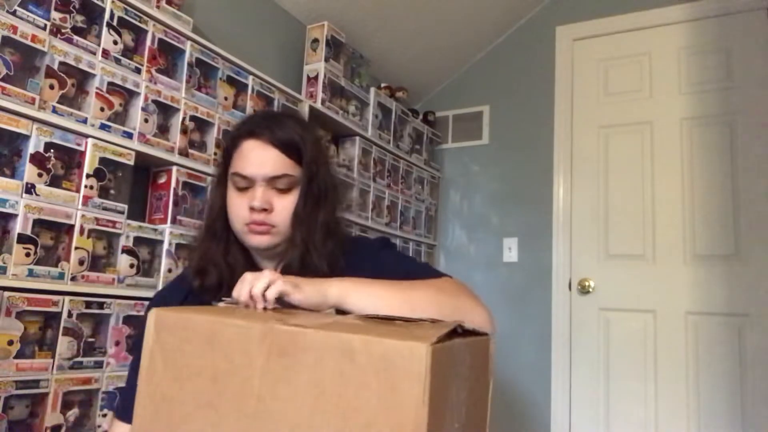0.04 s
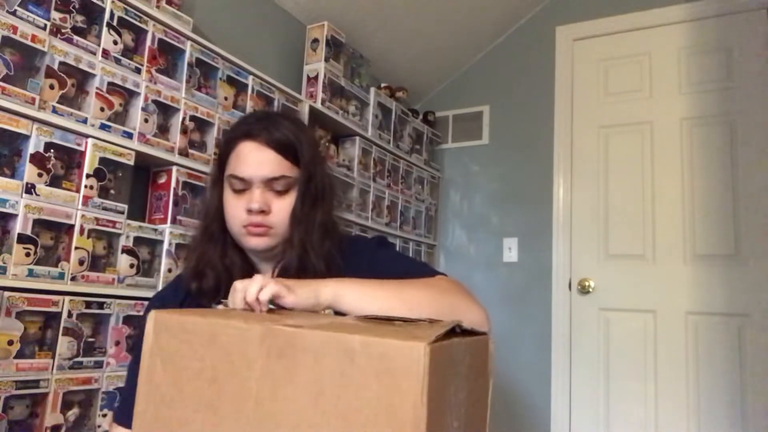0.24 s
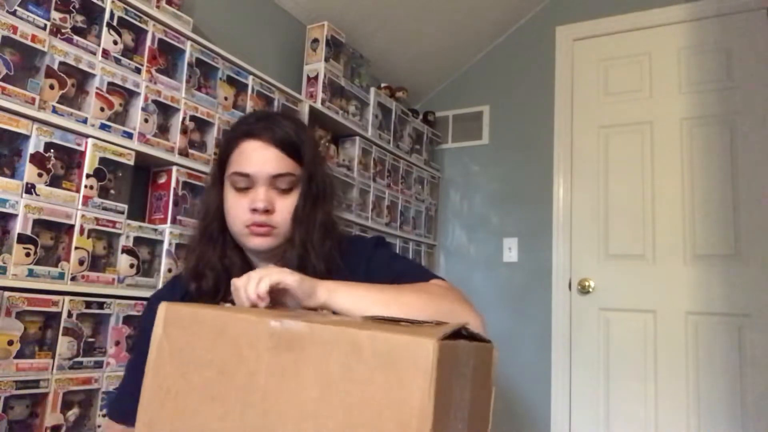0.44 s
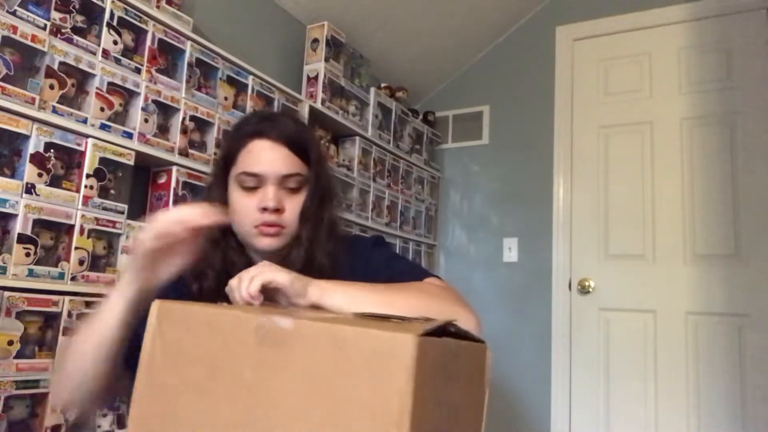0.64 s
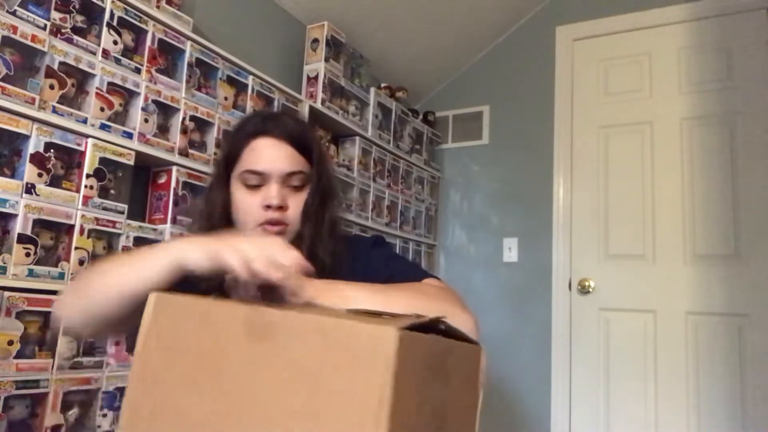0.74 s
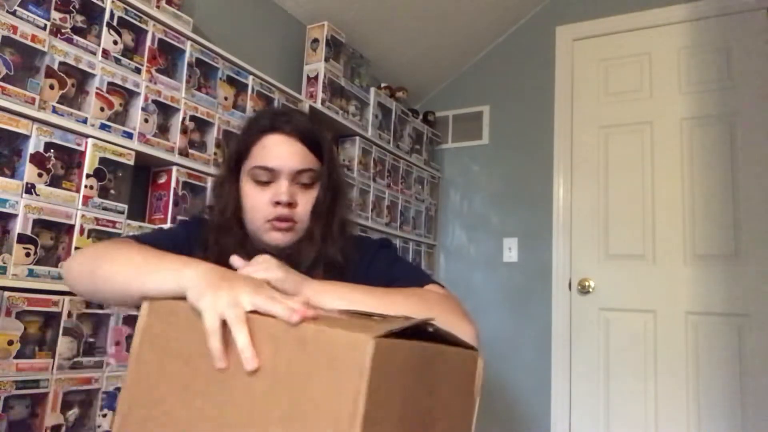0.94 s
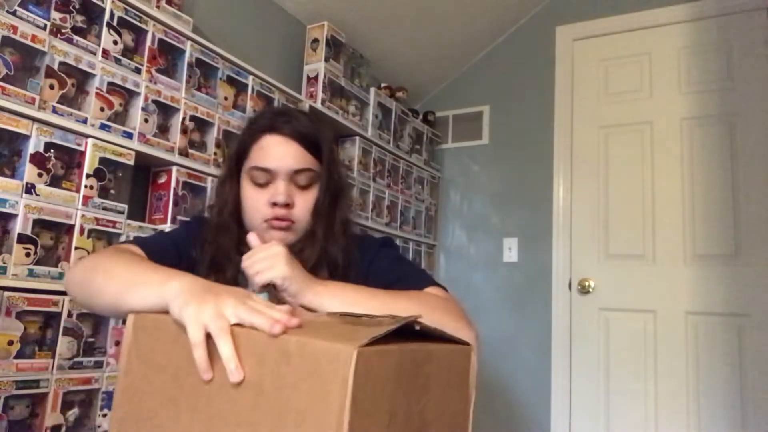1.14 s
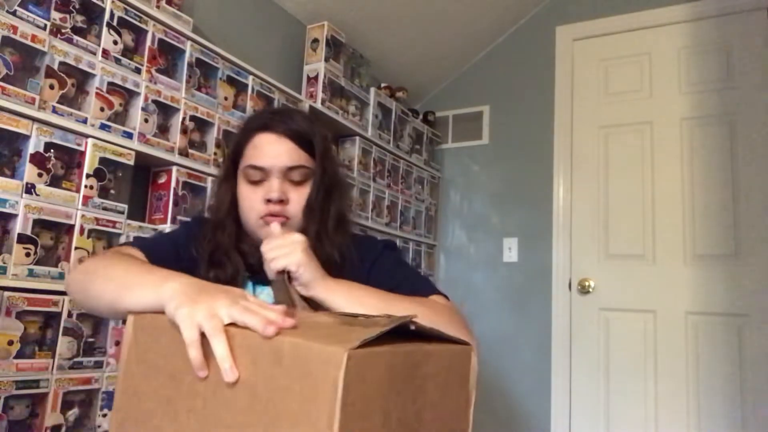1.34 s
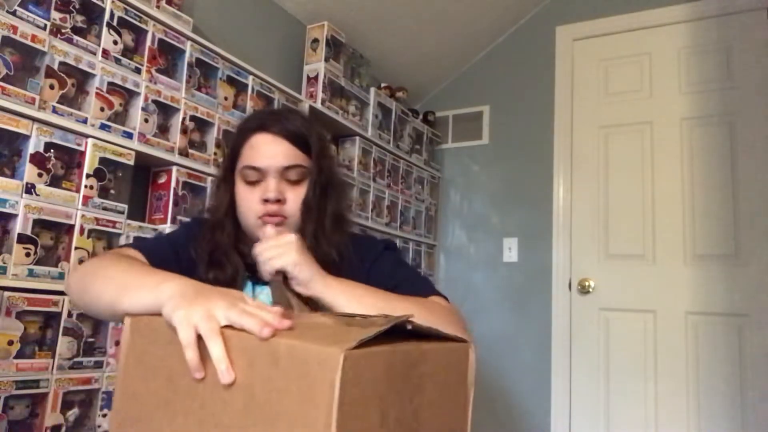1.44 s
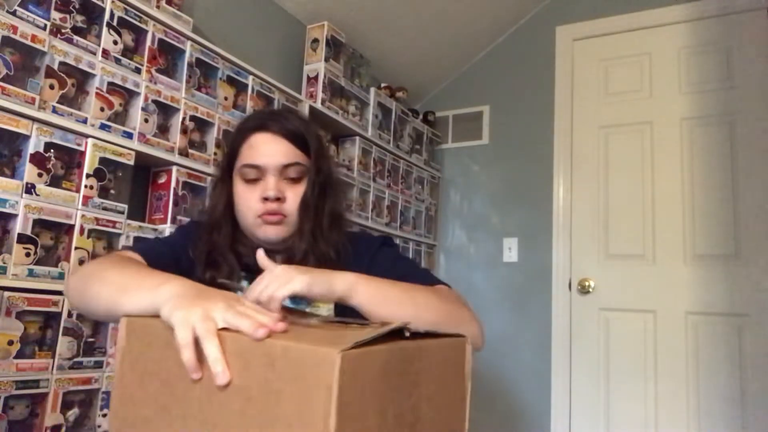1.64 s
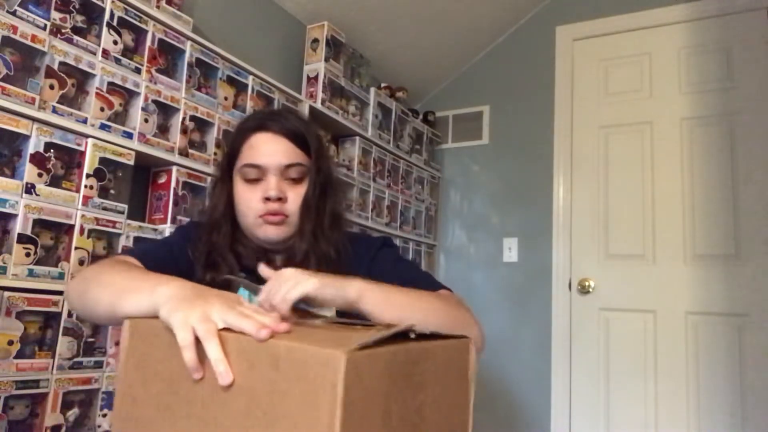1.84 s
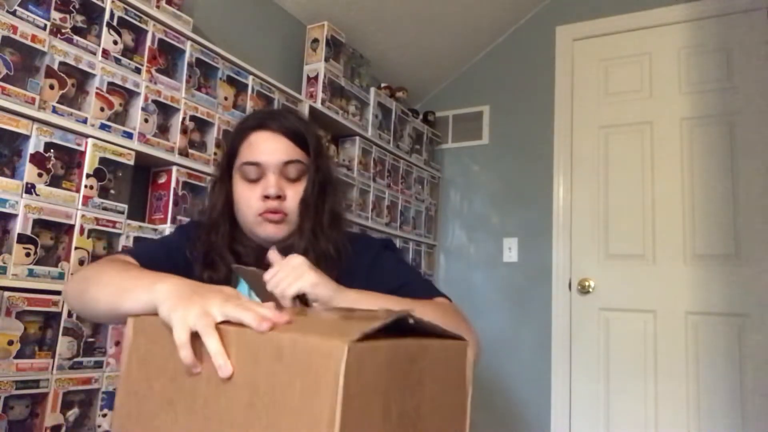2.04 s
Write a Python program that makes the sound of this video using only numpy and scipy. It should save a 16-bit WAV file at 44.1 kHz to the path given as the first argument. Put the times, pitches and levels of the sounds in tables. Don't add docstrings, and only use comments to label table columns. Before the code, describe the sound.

Tape on a cardboard box being scratched and ripped loose, with loud snaps and dull hollow bumps

```python
import sys
import numpy as np
from scipy import signal
from scipy.fft import rfft, irfft
from scipy.io import wavfile
from scipy.ndimage import uniform_filter1d

SR = 44100
rng = np.random.default_rng(int(sys.argv[2]) if len(sys.argv) > 2 else 0)


def invert_db(level):
    return 10 ** (np.asarray(level, dtype=float) / 20)


def digitize_waveform(pressure):
    field = np.atleast_2d(pressure).T
    bounded = np.clip(field, -1, 1)
    quanta = np.round(bounded * 32767).astype(np.int16)
    wavfile.write(sys.argv[1], SR, quanta)


N = 91375


def evened(x):
    return x / np.sqrt(np.mean(x ** 2) + 1e-20)


def peaked(x, db):
    return invert_db(db) * x / abs(x).max()


def read(points, hz):
    f, value = np.transpose(points)
    return np.interp(np.log(hz + 1), np.log(f + 1), value)


def add(mix, s, sound):
    part = mix[round(s * SR):][:len(sound)]
    part += sound[:len(part)]


def ring(x, hz, width):
    b, a = signal.iirpeak(min(hz, 0.45 * SR), max(hz / width, 0.2), SR)
    return signal.lfilter(b, a, x)


def click(points, size=8000):
    log_gain = read(points, abs(np.fft.fftfreq(4096, 1 / SR))) * np.log(10) / 20
    phase = -signal.hilbert(log_gain).imag
    impulse = np.fft.ifft(np.exp(log_gain + 1j * phase)).real[:2048]
    return np.pad(impulse, (0, size))[:size]


def bell(hz, octaves, skirt_db):
    f = np.geomspace(100, 20000, num=40)
    u = np.log2(f / hz)
    hump = skirt_db * (1 - np.exp(-0.5 * (u / octaves) ** 2))
    bass_fall = 9 * np.minimum(np.log2(f / 1300), 0)
    treble_fall = -1.14 * np.maximum(u, 0)
    return np.transpose([f, hump + bass_fall + treble_fall])


def stroke(length, rise):
    u = np.linspace(0, 1, round(length * SR))
    return np.sin(np.pi * u ** (np.log(0.5) / np.log(np.clip(rise, 0.1, 0.9))))[:8000]


def grit(size, per_s, spread_db):
    chance, sign, extra = rng.random(size), rng.choice([-1., 1.], size), rng.exponential(1, size)
    return evened((chance < per_s / SR) * sign * invert_db(spread_db * np.minimum(extra, 4)))


def card(x):
    # f/Hz, level/dB, t60/s
    panel_modes = [(285, -11, 0.24), (642.5, 13, 0.074), (1090, 1, 0.15), (1243, -5, 0.19),
                   (1376, -6, 0.25), (1696, 1, 0.032), (1890, -27, 0.041), (2180, -28, 0.033),
                   (2400, -3, 0.14), (2970, -9, 0.042)]
    t = np.arange(len(x)) / SR
    modes = sum(invert_db(db - 60 * t / min(t60, 0.12)) * np.sin(2 * np.pi * hz * t) for hz, db, t60 in panel_modes)
    return signal.fftconvolve(x, modes)[:len(x)]


def hollow(x):
    # f/Hz, width/Hz, level/dB
    cavity_modes = [(111, 105, -10.5), (201.6, 34.4, -8.5), (240.8, 19.3, -6), (295.8, 20, -6.5)]
    boom = np.zeros(len(x))
    for k, (hz, width, db) in enumerate(cavity_modes):
        boom += (-1) ** k * invert_db(db) * ring(ring(x, hz, width), hz, 2.3 * width)
    return boom


def snaps():
    # t/s, peak level/dB, box level/dB, film f/Hz, room level/dB
    tears = [
        (1.0921, -4, -23.5, 1890, -1),
        (1.2854, -18, -13.5, 1510, -2),
        (1.7148, -20, -25, 5260, -6.5),
    ]
    # f/Hz, level/dB
    colours = [
        [(88, -22.5), (150, -12.5), (514, -1), (637, -5.5), (821, -0.5), (1830, -9), (2220, -10), (3920, 0.5),
         (16000, -6.5)],
        [(88, -21), (150, 2), (514, 10), (637, 4), (821, 3.5), (1500, -3), (2550, 8), (4160, 2.5), (16000, -9)],
        [(530, -35), (900, 9), (1150, -11), (1660, 6.5), (1970, -8.5), (4920, -9.5), (5680, -17), (6330, -6.5),
         (16000, -10)],
    ]
    # t from the snap/s, level/dB
    further_slips = [
        (-.0009, -17),
        (-.0005, -38),
        (.0006, 2.5),
    ]
    near, far = np.zeros(N), np.zeros(N)
    for (s, db, box_db, hz, room_db), colour in zip(tears, colours):
        slip = click(colour)
        film = ring(slip, hz, hz / 3)
        thin = peaked(slip, 0) + peaked(film, 6)
        for late, slip_db in further_slips:
            shape = thin if late > 0 else np.diff(thin, prepend=0)
            add(near, s + late, -peaked(shape, db + slip_db))
        box = peaked(card(slip), db + box_db) + peaked(hollow(slip), db + box_db - 4.5)
        add(near, s, peaked(thin, db) + box)
        far_film = peaked(peaked(slip, 0) + peaked(film, 5), db)
        add(far, s, invert_db(room_db) * (far_film + box))
    return signal.lfilter(*signal.butter(1, 6000, fs=SR), near), far


def rattle():
    # t/s, peak level/dB, f/Hz, t60/s
    rings = [(1.0922, -6, 1880, .012), (1.095, -14, 2330, 0.0064), (1.094, -17, 285, 0.043),
             (1.0985, -8.5, 2120, 0.0053), (1.099, -16.5, 3320, 0.0078), (1.0995, -13, 1213, 0.022),
             (1.106, -20, 1760, 0.038), (1.1095, -30, 3920, 0.0066), (1.115, -18, 1224, 0.012),
             (1.117, -16, 1980, 0.0063), (1.126, -27, 285, 0.041), (1.13, -27, 1210, 0.1),
             (1.2855, -25, 1620, 0.014), (1.2862, -19.5, 538, 0.019), (1.288, -25, 2090, 0.018),
             (1.295, -27.5, 652, 0.16), (1.296, -27.5, 2640, 0.0096), (1.3, -33, 1190, 0.052),
             (1.313, -35, 2660, .015), (1.323, -34.5, 1100, 0.015), (1.323, -31, 298, 0.02),
             (1.336, -33.5, 653, 0.021), (1.0935, -23, 710, .04), (1.104, -23.5, 715, 0.024),
             (1.2859, -31, 3610, 0.011), (1.297, -31, 3050, .015), (1.307, -36, 2220, 0.021),
             (.067, -48.5, 2870, 0.074), (.068, -47.5, 740, 0.11), (.097, -41.5, 620, 0.15)]
    out, t = np.zeros(N), np.arange(8000) / SR
    onset = 1 - np.exp(-t / 0.00022)
    for s, db, hz, t60 in rings:
        add(out, s, peaked(onset * invert_db(-60 * t / t60) * np.sin(2 * np.pi * hz * t), db))
    return out


def ticks():
    # t/s, peak level/dB, f/Hz
    bonds = [(.504, -46.5, 9300), (0.5686, -57, 9350), (0.5796, -39, 12100), (.5872, -44, 8100),
             (0.5933, -34.5, 7140), (0.5948, -42, 2060), (0.603, -52, 5960), (.604, -55, 2230),
             (0.557, -52, 4300), (.631, -55, 1450), (0.648, -50, 11400), (0.6928, -42.5, 5940),
             (0.6924, -45.5, 1480), (0.7348, -47, 3860), (.752, -42.5, 8300), (0.7799, -38, 3820),
             (0.811, -46, 1940), (0.82, -39, 2600), (0.825, -36.5, 5760), (0.8413, -35.5, 3400),
             (0.8527, -44, 2200), (.857, -34.5, 5270), (0.857, -40, 3600), (.864, -40, 4100),
             (0.87, -36.5, 2770), (0.885, -54, 2480), (0.9015, -40, 4230), (.913, -43, 4160),
             (0.933, -43, 1520), (0.9534, -32, 1890), (0.955, -40.5, 3420), (0.9935, -43.5, 2520),
             (.993, -50, 4340), (1.0317, -37.5, 1890), (1.0495, -41.5, 6000), (1.055, -47, 4100),
             (1.264, -45.5, 3760), (1.2853, -31, 7500), (1.0985, -20.5, 12000), (1.113, -38, 13500),
             (1.386, -43.5, 7950), (1.4958, -44, 4960), (1.7972, -39, 4350), (1.9687, -33, 3340),
             (1.98, -32, 12000), (1.996, -56, 13200), (2.008, -54, 12600), (2.033, -41, 5500),
             (2.049, -41, 12000)]
    out = np.zeros(N)
    for (s, db, hz), (a, b) in zip(bonds, rng.random((len(bonds), 2))):
        slip = click(bell(hz, octaves=0.45, skirt_db=-11), size=600)
        slip = peaked(peaked(slip, 0) + peaked(ring(slip, hz, hz / 3), 0), db)
        add(out, s, slip)
        add(out, s + 0.0003 + 0.0007 * a, -invert_db(-3 - 6 * b) * slip)
    return out


def crackle():
    # t/s, length/s, rms level/dB, f/Hz
    patches = [
        (0.759, 0.17, -71.5, 3270),
        (0.85, 0.022, -60, 3730),
        (0.9, 0.14, -61.5, 2400),
        (1.027, 0.071, -58, 3060),
        (1.297, 0.12, -64.5, 7900),
        (1.87, 0.18, -58.5, 5140),
    ]
    out = np.zeros(N)
    for s, length, db, hz in patches:
        shower = 0
        for k in (0.5, 0.8, 1.2, 1.7):
            slips = grit(8000, per_s=200, spread_db=4)
            shower = shower + signal.fftconvolve(slips, click(bell(hz * k, 0.26, -8.5), size=600))
        env = stroke(length, 0.34)
        add(out, s, invert_db(db) * env * evened(shower)[:len(env)])
    return out


def bumps():
    # t/s, peak level/dB, push f/Hz
    pushes = [(0.47, -31, 113), (0.482, -21.5, 135), (0.493, -37.5, 230), (0.503, -32.5, 180),
              (0.529, -44, 245), (0.544, -51, 250), (0.615, -34.5, 110), (1.575, -34, 174),
              (1.65, -32.5, 164), (1.666, -33.5, 193), (1.676, -39.5, 270), (1.69, -42, 280),
              (1.97, -38, 227)]
    out = np.zeros(N)
    for s, db, hz in pushes:
        cycles = np.arange(12000) / SR * hz
        push = np.sin(2 * np.pi * cycles) * cycles * np.exp(-(cycles / 0.716) ** 2)
        add(out, s, peaked(push, db) + peaked(hollow(push), db - 29.5))
    return out


def taps():
    # t/s, peak level/dB, f/Hz
    nail_taps = [
        (0.022, -47, 1200),
        (.900, -34.5, 694),
        (.9535, -35.5, 583),
        (1.5671, -38.5, 990),
        (1.575, -33.5, 970),
    ]
    # t/s, peak level/dB
    flap_slips = [
        (1.4211, -40.5),
        (1.4329, -35),
        (1.44, -31.5),
        (1.4501, -31.5),
        (1.462, -37),
    ]
    # f/Hz, width/Hz, level/dB
    flap_modes = [(317, 220, -4), (1100, 260, 6), (3010, 1300, 8)]
    out, contact = np.zeros(N), click([(100, -5.5), (3000, 0.5), (16000, 3)])
    for s, db, hz in nail_taps:
        nail = ring(ring(contact, hz, 0.5 * hz), hz, hz)
        add(out, s, peaked(nail, db) + peaked(card(contact), db - 3))
    slip = np.zeros(len(contact))
    for k, (hz, width, db) in enumerate(flap_modes):
        slip += (-1) ** k * peaked(ring(ring(contact, hz, width), hz, 3 * width), db)
    for s, db in flap_slips:
        add(out, s, peaked(slip, db))
    return out


def wandering(x, hz, width):
    noise = rng.standard_normal(len(x))
    drift = evened(uniform_filter1d(uniform_filter1d(noise, size=600), size=600))
    turn = np.exp(2j * np.pi * np.cumsum(hz * (1 + 0.06 * drift)) / SR)
    r = np.exp(-np.pi * width / SR)
    smooth = signal.lfilter([1], [1, -r], signal.lfilter([1], [1, -r * r], x / turn))
    return (turn * smooth).real


def scrapes():
    # t/s, length/s, rms level/dB, span f/Hz, card level/dB
    strokes = [(.01, 0.025, -61, 1270, -4), (0.069, 0.039, -50, 1570, -9),
               (0.089, 0.077, -46.5, 1690, -4.5), (0.161, 0.11, -47.5, 1620, -12),
               (0.213, 0.057, -38, 1585, -43), (0.233, 0.047, -47, 1130, -40),
               (0.769, 0.042, -65.5, 2670, 13.5), (0.856, 0.15, -60, 1740, 6.5),
               (1.028, 0.031, -71, 1880, -21), (1.404, 0.083, -61.5, 1100, 5.5),
               (1.552, 0.41, -64, 1320, 2), (1.797, 0.036, -64, 1530, 12), (1.879, 0.22, -69.5, 1280, 12)]
    card_hz, sag = 550, 0.094
    out = np.zeros(N)
    for s, length, db, hz, low_db in strokes:
        g = grit(8000, per_s=2500, spread_db=3)
        env = stroke(length, 0.22)
        slide = np.minimum(np.arange(len(g)) / len(env), 1) * np.pi / 2
        f_high, f_low = card_hz * (1 + sag), card_hz * (1 - sag)
        high = evened(ring(ring(g, f_high, 108), f_high, 270))
        low = evened(ring(ring(g, f_low, 108), f_low, 270))
        tone = evened(wandering(g, hz, hz / 4.2))
        tone += invert_db(low_db) * (np.cos(slide) * high + np.sin(slide) * low)
        tone += invert_db(-6.5) * evened(ring(g, 1.9 * hz, 0.33 * hz))
        add(out, s, invert_db(db) * env * tone[:len(env)])
    return out


def rubs():
    # t/s, length/s, rms level/dB, slope/(dB per octave)
    strokes = [(0.038, 0.14, -52, -3), (0.189, 0.14, -46.5, -6.5), (0.323, 0.17, -59.5, -1),
               (.66, 0.73, -59.5, 0), (0.564, 0.051, -90, 18), (0.772, 0.21, -53, -5.5),
               (0.879, 0.14, -51, -37), (1.032, 0.042, -58, -28), (1.385, 0.12, -59.5, -5.5),
               (1.511, 0.27, -50.5, -3.5), (1.791, 0.023, -47.5, -3.5), (1.856, 0.24, -50.5, -6.5)]
    out, hz = np.zeros(N), np.fft.rfftfreq(10000, 1 / SR)
    for s, length, db, slope_db in strokes:
        tilt = invert_db(slope_db * np.log2(hz / 3000 + 0.35)) * np.minimum(hz / 900, 1)
        fizz = irfft(rfft(grit(10000, per_s=6000, spread_db=3.4)) * tilt)
        env = stroke(length, 0.34) ** 2
        add(out, s, invert_db(db) * env * evened(fizz)[:len(env)])
    return out


def shoves():
    # t/s, length/s, rms level/dB
    shifts = [
        (0.496, 0.052, -40),
        (.63, 0.44, -57.5),
        (0.832, .2, -46),
        (1.408, 0.05, -43.5),
        (1.57, 0.062, -42.5),
        (1.637, 0.093, -41.5),
        (1.793, 0.086, -46),
        (1.875, 0.18, -47.5),
    ]
    out = np.zeros(N)
    for s, length, db in shifts:
        env = stroke(length, 0.34)
        rumble = evened(hollow(grit(10000, per_s=900, spread_db=5.8)))
        add(out, s, invert_db(db) * env * rumble[:len(env)])
    return out


def room(x):
    # f/Hz, t60/s
    decay = [(120, 0.28), (500, 0.25), (1500, 0.29), (4000, 0.22), (12000, 0.17)]
    # t/s, level/dB
    echoes = [(.0026, -3.5), (.0066, -5), (.0082, -11), (.0125, -7.5), (.0165, -6), (.0255, -13.5)]
    impulses = np.zeros(SR // 2)
    at = np.arange(150, SR // 2 - 20, 15)
    impulses[at + rng.integers(0, 15, len(at))] = rng.choice([-1., 1.], len(at))
    hz, t, z = signal.stft(impulses, SR, nperseg=256)
    tail = signal.istft(z * invert_db(-60 * t / read(decay, hz)[:, None]), SR, nperseg=256)[1]
    tail = invert_db(4.5) * tail / np.linalg.norm(tail)
    for k, (s, echo_db) in enumerate(echoes):
        tail[round(s * SR)] += (-1) ** k * invert_db(echo_db)
    return signal.fftconvolve(x, tail)[:N]


def floor():
    # f/Hz, level/(dB per Hz)
    spectrum = [(25, -11), (55, 34.5), (110, 14), (270, 15), (600, 2.5), (1800, 2), (11000, -12),
                (16000, -21)]
    hz = np.fft.rfftfreq(N, 1 / SR)
    hiss = evened(irfft(rfft(rng.standard_normal(N)) * invert_db(read(spectrum, hz)), N))
    hum = evened(ring(ring(rng.standard_normal(N), 52, 36), 52, 36))
    return invert_db(-52) * hiss + invert_db(-63) * hum


def scene():
    snap, snap_far = snaps()
    small = ticks() + taps() + crackle()
    push = bumps()
    drag = invert_db(-4) * (scrapes() + rubs() + shoves())
    wet = room(snap_far + invert_db(-8) * small + invert_db(-12) * push + invert_db(-2) * drag)
    return (snap + rattle() + small + push + drag + wet + floor())[None]


def roll_off(x):
    return signal.sosfilt(signal.butter(12, 16850, fs=SR, output="sos"), x)


def record(dry):
    x = signal.sosfilt(signal.butter(3, 62.6, "high", fs=SR, output="sos"), dry)
    x = x - 0.45 * ring(x, 10320, 410)
    band_limit = signal.firwin(511, 16000, window=("kaiser", 9), fs=SR)
    x = signal.oaconvolve(x, band_limit[None], "same")
    return roll_off(x)


dry = scene()
out = record(dry)
digitize_waveform(out)
```